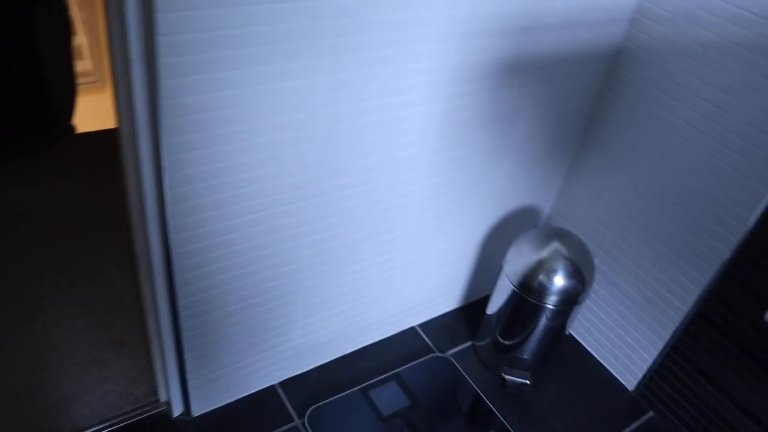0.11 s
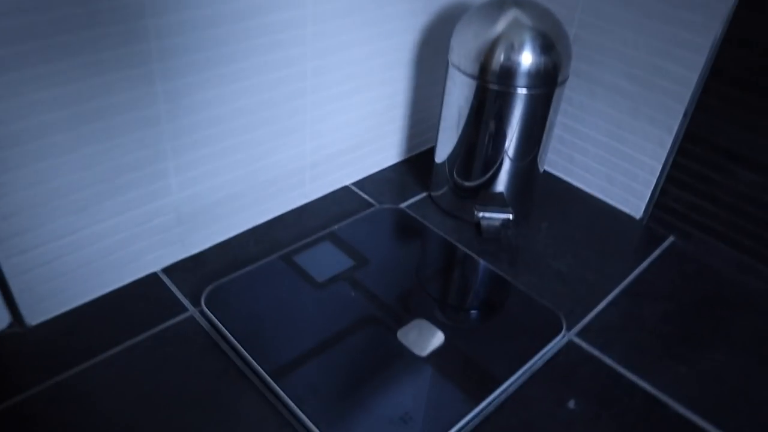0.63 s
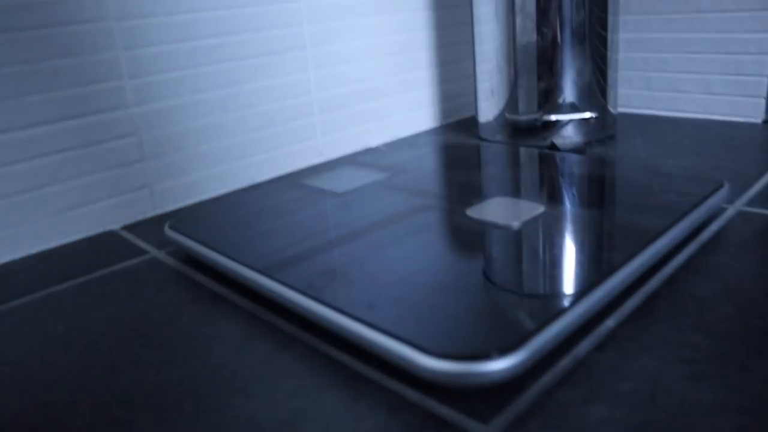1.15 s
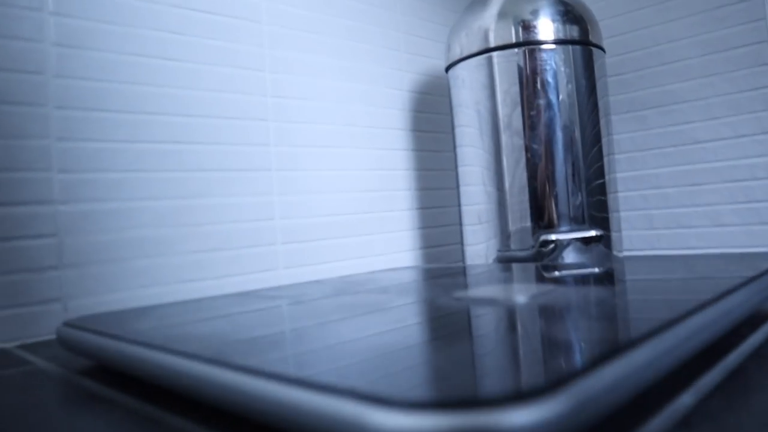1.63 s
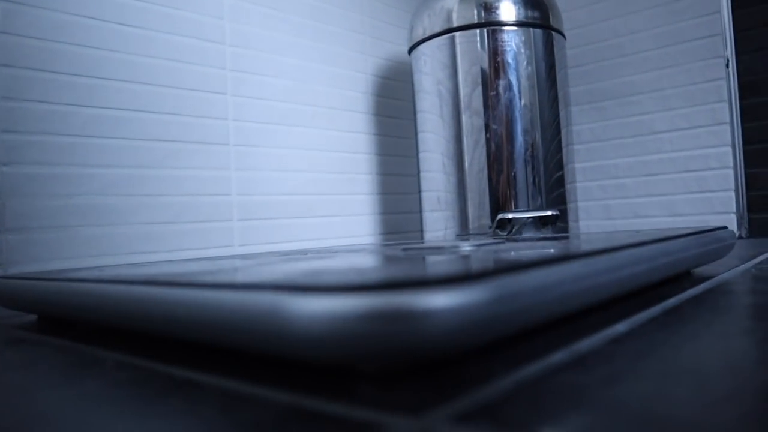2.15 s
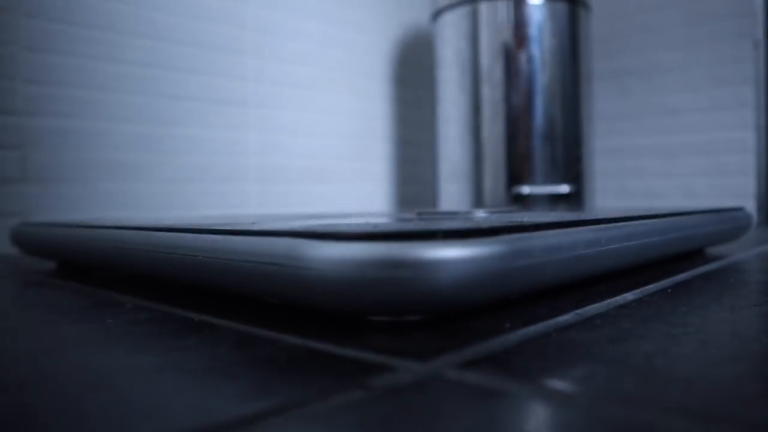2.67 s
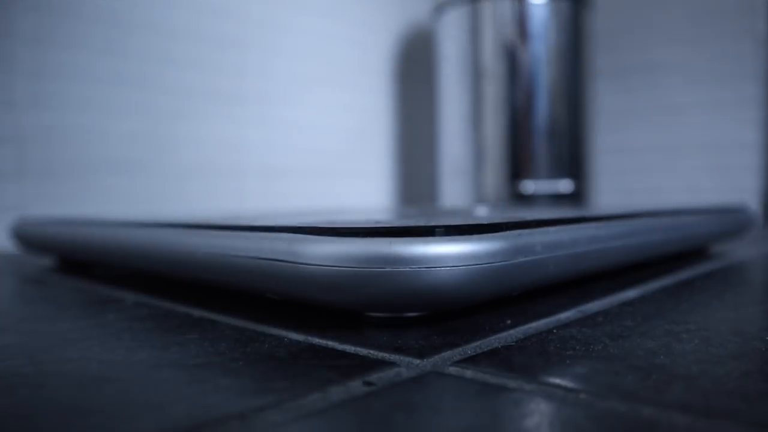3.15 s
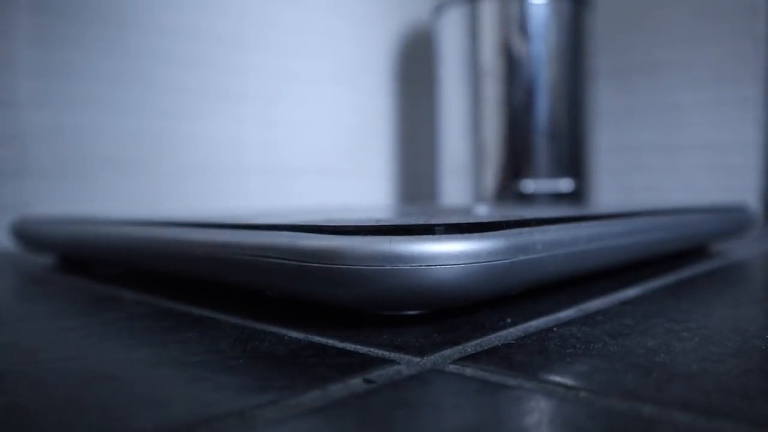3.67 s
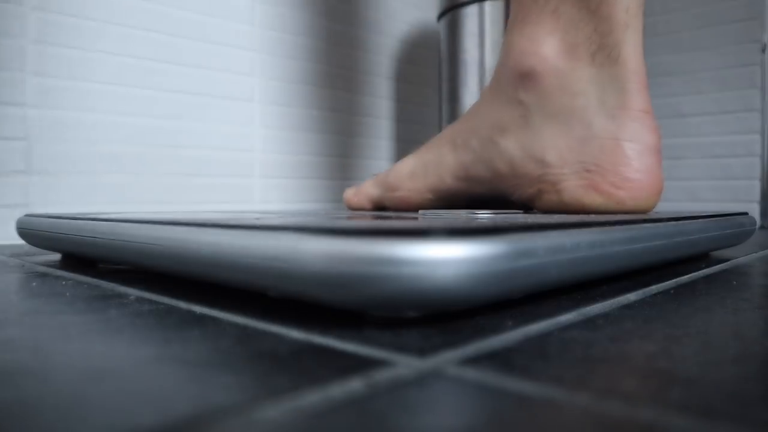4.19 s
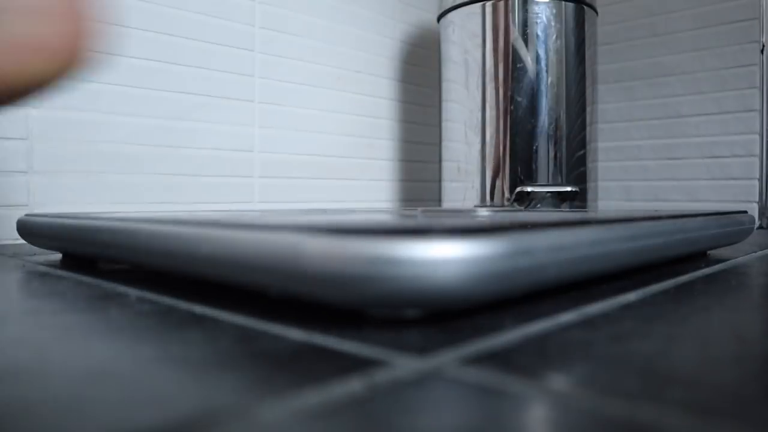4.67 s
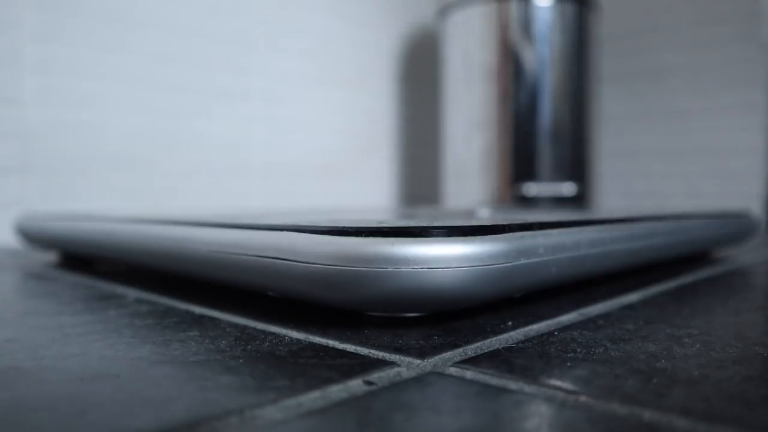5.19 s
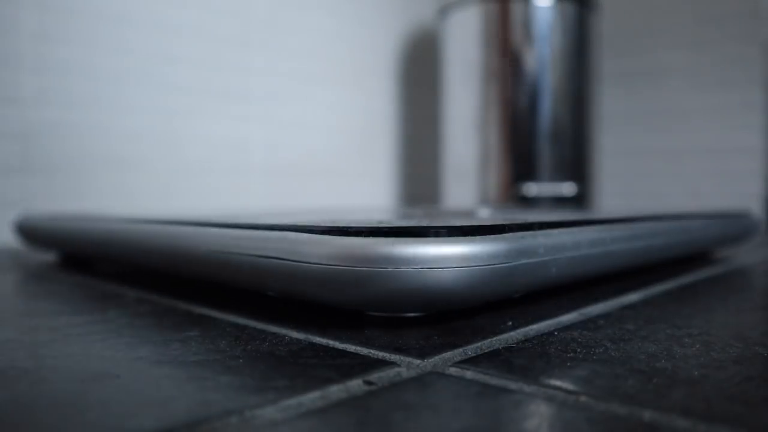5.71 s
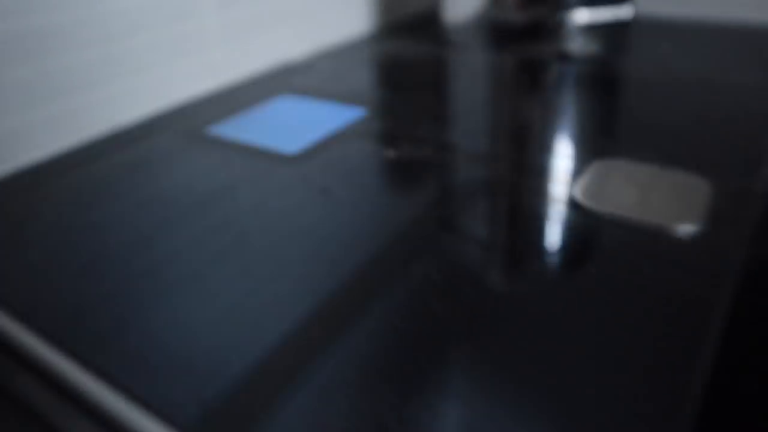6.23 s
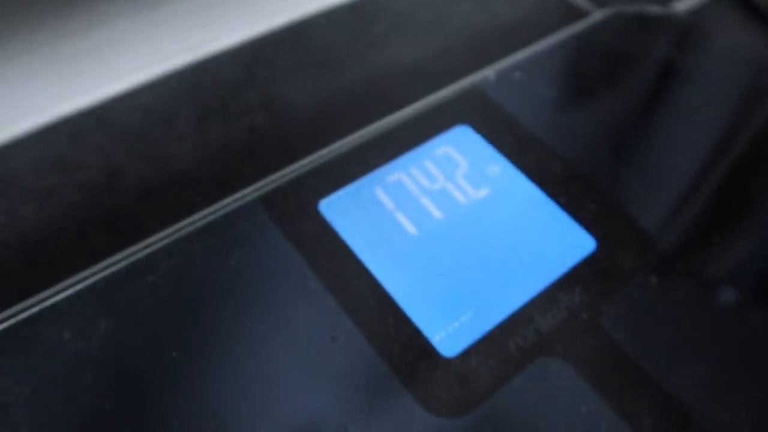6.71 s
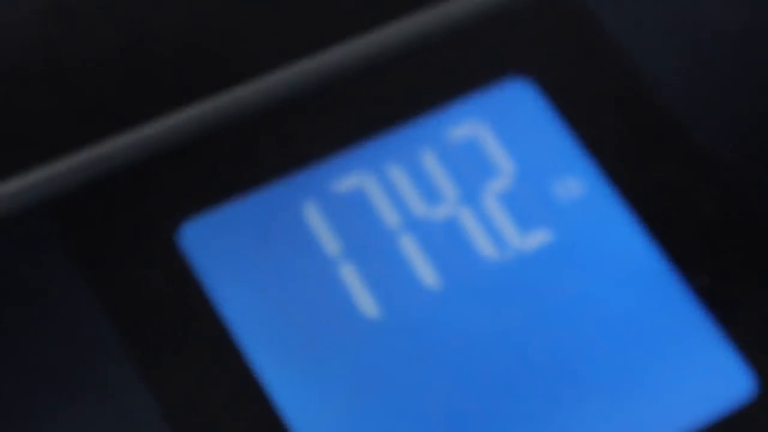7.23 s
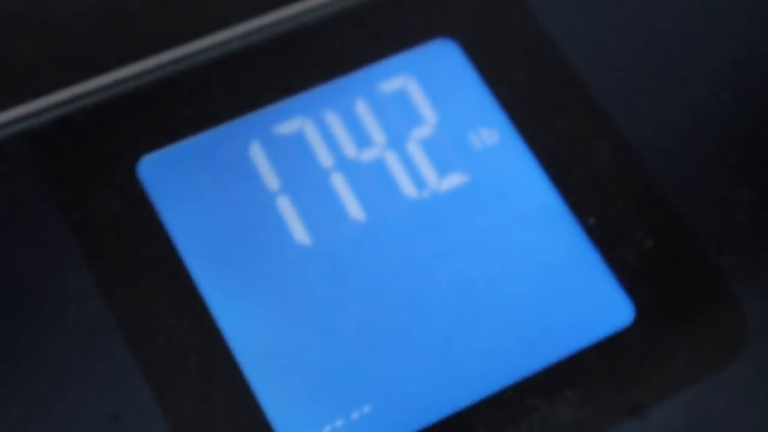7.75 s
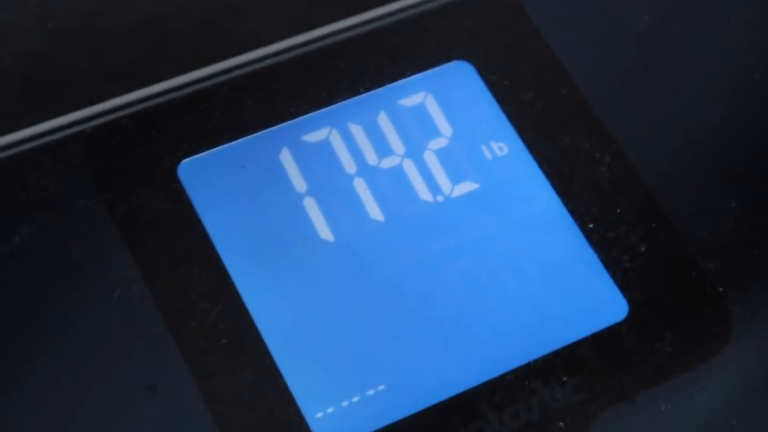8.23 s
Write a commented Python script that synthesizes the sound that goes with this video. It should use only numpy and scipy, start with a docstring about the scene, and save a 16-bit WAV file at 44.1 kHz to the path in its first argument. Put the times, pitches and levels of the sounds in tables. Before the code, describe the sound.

Close handling noise from a camera microphone: light bumps, a bright clack ringing off tiled walls, then a hard dull knock. A low floor boom and light clicks mark bare soles on a glass scale. Faint skin rustle and low room noise fill the pause. Heavy double clunks and rubbing follow as the camera is lifted, fading to small rattling ticks.

```python
"""Camera set down in a tiled bathroom

A hand-held camera is lowered to the tiles of a small hard bathroom, set down, left while bare feet step on and
off a glass scale, then picked up again. Knocks are short noisy contacts that ring the camera shell, steps are
choked low resonances of the floor, and skin and cloth rub as stick-slip noise. Decaying noise and paired
standing waves form the room; the camera widens its stereo picture in the treble and clips the highest peaks."""
import sys
import numpy as np
from scipy import signal
from scipy.fft import rfft, irfft, next_fast_len
from scipy.io import wavfile
from scipy.ndimage import uniform_filter1d, map_coordinates

SR = 44100
rng = np.random.default_rng(int(sys.argv[2]) if len(sys.argv) > 2 else 0)


def master(y):
    """Save y as 16-bit WAV."""
    cut = np.clip(np.atleast_2d(y).T, -1, 1)
    pcm = np.round(cut * 32767)  # scale
    wavfile.write(sys.argv[1], SR, pcm.astype(np.int16))


def invert_db(level):
    """Linear amplitude ratio for a level in decibels (20 dB per decade), elementwise."""
    return 10 ** (np.asarray(level, dtype=float) / 20)


N = 369116

# Relative spectrum of the fine fizz of rubbing. Each row: frequency in hertz, level in dB.
FIZZ_TONE = [(2940, -5.5), (5000, -6), (8090, -8), (9080, -6), (9950, -3), (11500, -1), (15800, -21.5)]


def shape(x, points):
    """Linear filtering: weights the spectrum of x by (Hz, dB) points joined on a logarithmic frequency axis."""
    hz, db = np.transpose(points)
    size = next_fast_len(x.shape[-1])
    f = np.maximum(np.arange(size // 2 + 1) * SR / size, 1)
    gain = invert_db(np.interp(np.log(f), np.log(hz), db))
    return irfft(rfft(x, size) * gain, size)[..., :x.shape[-1]]


def band(x, lo_hz, hi_hz):
    """Causal band-pass: a resonant filter responds only after its excitation."""
    sos = signal.butter(2, [lo_hz, min(hi_hz, SR / 2.2)], "band", fs=SR, output="sos")
    return signal.sosfilt(sos, x)


def unit(x):
    """Normalisation by mean power: scales x to rms 1."""
    return x / np.sqrt(np.mean(x ** 2))


def grainy(size, flicker_db, ms):
    """Stick-slip friction: mid and side noise whose level jumps together as the contact sticks and slips."""
    k = max(int(ms * SR / 1000), 1)
    jumps = np.repeat(rng.standard_normal(size // k + 1), k)[:size]
    jumps = uniform_filter1d(jumps, k)
    return rng.standard_normal((2, size)) * invert_db(flicker_db * jumps)


def add(out, x, s):
    """Superposition: mixes x into out from s seconds on."""
    i = int(s * SR)
    out[..., i:i + x.shape[-1]] += x[..., :N - i]


def ring(modes, t):
    """Modal superposition: a sum of exponentially decaying sines given as (Hz, dB, t60 in s)."""
    return sum(invert_db(db) * np.sin(2 * np.pi * hz * t) * 1000. ** (-t / t60) for hz, db, t60 in modes)


def curve(rows):
    """Amplitude envelopes: gains of the dB columns over time, silent outside the rows."""
    s, *columns = np.transpose(rows)
    t = np.arange(N) / SR
    return invert_db([np.interp(t, s, c, -120, -120) for c in columns])


def shell_ring():
    """Impulse response of the camera shell: a tick excites a few damped modes, broader ones dying sooner."""
    # Each row: frequency in hertz, bandwidth in hertz that sets t60 = 1.13 / bandwidth, level in dB.
    shell = [(880, 45, 17), (1550, 450, 21), (2310, 470, 26), (2980, 840, 11.5)]
    modes = [(hz, db, 1.13 / width) for hz, width, db in shell]
    return ring(modes, np.arange(1024) / SR)[None]


def knocks():
    """Impact excitation: a tick and rattle ring shell and struck spot; returns near sound, dull part, wall feed."""
    # Knocks and ticks on shell, tiles and scale. Each row: start in seconds, peak of the mids in dB,
    # pitch in hertz, treble in dB against the mids, wall feed in dB against the mids.
    hard_blows = [(0.655, -20.5, 1000, -53, -7.5), (0.842, -31, 980, -40, -6.5),
                  (0.8512, -22.5, 4670, -9, -8.5), (0.857, -33.5, 704, -40, 0.5),
                  (0.960, -24.5, 890, -35, -3.5), (1.133, -16, 1636, -10, -10), (1.403, -7, 2400, 1, 6.5),
                  (2.274, -20.5, 2050, -54, -10.5), (2.422, -33, 507, -28, 2),
                  (2.518, -3, 1500, -24, -21.5), (2.5392, -7.5, 1480, -34, -28),
                  (2.640, -19, 1630, -11, -18.5), (2.94, -39.5, 736, -6, 13), (3.179, -29, 1200, -4.5, 9.5),
                  (3.687, -27, 626, -8.5, 1), (3.807, -18.5, 880, 3.5, -3), (3.932, -23, 930, -42, -5.5),
                  (4.342, -26.5, 645, -7, 4.5), (4.434, -31.5, 1500, -10, -20),
                  (4.448, -15, 2120, -1.5, -4.5), (4.502, -21, 880, -29, -30.5),
                  (4.568, -27.5, 790, -3, -6), (5.13, -28, 720, -12, 10.5), (5.645, -33.5, 1550, -7, 0),
                  (5.919, -15, 1120, -1, -28.5), (5.985, -14.5, 2110, -25, -14),
                  (6.044, -8.5, 1930, -3, -17), (6.065, -16, 910, -4, -21), (6.287, -40.5, 860, 2, 19),
                  (6.3584, -9, 1390, -10, -15), (6.501, -41, 880, -2, 21), (6.78, -26.5, 650, -34, -44),
                  (6.835, -31, 507, -6, -13), (7.515, -34.5, 810, -1.5, -9), (7.716, -32, 870, -15, 1),
                  (7.749, -29, 880, -13, 1), (7.765, -21.5, 1870, -13, -9), (8.016, -33.5, 1680, -10, -5)]
    # Blows heard mostly through the walls, dull and wet. Each row: start in seconds, peak of the mids in dB,
    # pitch in hertz, rattle decay in milliseconds, treble in dB against the mids.
    hollow_blows = [(1.411, -26.5, 224, 51, -29), (1.543, -10.5, 1510, 64, -32), (1.547, -29, 298, 34, -36),
                    (1.778, -26, 915, 94, -27), (1.793, -23, 3500, 80, -23), (2.519, -13.5, 246, 3.9, -45),
                    (3.512, -36, 238, 6.3, -45), (4.351, -29.5, 304, 3.8, -35), (5.13, -29, 366, 5.1, -35),
                    (5.92, -18.5, 460, 24, -40), (2.526, -20.5, 304, 40, -38)]
    hard_rattle_ms, hollow_room_db = 4.87, 5.5
    tick, chatter_gain, chatter_ms = 6.25, 1.29, 1.9  # first tick and chatter against the rattle
    spot_cycles = 18.7  # cycles of the struck spot's own note within its t60

    near, dull, far = np.zeros((2, N)), np.zeros(N), np.zeros(N)
    t = np.arange(4096) / SR
    click = 1. * (t == 0)
    hard = [(*row, hard_rattle_ms) for row in hard_blows]
    hollow = [(s, db, hz, treble_db, hollow_room_db, ms) for s, db, hz, ms, treble_db in hollow_blows]
    for s, db, hz, treble_db, room_db, rattle_ms in hard + hollow:
        # the first touch chatters for a moment, then the rattle dies away
        chatter = 1 + chatter_gain * np.exp(-t * 1000 / chatter_ms)
        rattle = chatter * rng.standard_normal((2, len(t)))
        contact = (rattle + tick * click) * np.exp(-t * 1000 / rattle_ms)

        spot_ring = ring([(hz, 0, spot_cycles / hz)], t)[None]
        note = signal.fftconvolve(contact, spot_ring)[:, :len(t)]
        rung = signal.fftconvolve(contact, shell_ring())[:, :len(t)]
        spot = band(band(contact, hz / 1.97, hz * 2.44), 20, hz * 2.1)
        # dull blows barely wake the shell
        shell_gain = 0.62 * min(hz / 800, 1) ** 2
        mids = shell_gain * rung / np.abs(rung).max()
        mids = mids + spot / np.abs(spot).max() + 0.41 * note / np.abs(note).max()

        body = band(contact, 125, 397)
        treble = band(contact * np.exp(-t / 0.015), 5200, 12700)
        body_db = -11 - 7 * np.log2(hz / 1000)  # lower spots move more of the body
        parts, gains = (mids, body, treble), (0, body_db, treble_db)
        mids, body, treble = (invert_db(db + g) * x / np.abs(x[0]).max() for x, g in zip(parts, gains))
        add(near, mids + body + treble, s)
        add(dull, body[0], s)

        # the walls hear the blow from all sides, so the shell's own colour evens out
        wall_mids = band(band(click, hz / 5, hz * 2.58), hz / 5, hz * 2.58)
        wall_treble = invert_db(treble_db - 5.5) * band(click, 5650, 13200)
        add(far, invert_db(db + room_db) * (wall_mids + wall_treble), s)
    return near, dull, far


def thuds():
    """Damped resonance: a soft push swells into a ring until settling weight chokes it; near sound, wall feed."""
    # Dull blows through floor or shell. Each row: start in seconds, level of the free ring in dB,
    # pitch in hertz, rise in milliseconds, time until damped in milliseconds.
    blows = [(0.301, -21.5, 120, 2.7, 5.6), (0.621, -31, 68.5, 2.9, 35), (0.685, -24, 83.3, 1.8, 11),
             (1.411, -29, 60, 22, 240), (1.408, -30, 294, 3.1, 120), (1.546, -33, 325, 3.8, 54),
             (1.503, -22, 60, 5.1, 105), (1.789, -37.5, 64, 15, 150), (2.419, -29, 191, 3.4, 16),
             (2.488, -27.5, 195, 3.8, 18), (2.5174, -7.5, 185, 1.8, 6.5), (2.545, -22.5, 217.7, 9.1, 53),
             (2.64, -24.5, 229, 7.8, 59), (2.549, -33, 146, 7.3, 165), (2.962, -31.5, 65.6, 45, 110),
             (3.065, -22.5, 65.4, 22, 37), (3.2345, -4, 63, 17, 54.5), (3.235, -31.5, 232, 12, 32),
             (3.51, -33.5, 234, 4.2, 35), (3.297, -27, 63.6, 2.1, 110), (3.506, -27, 70, 4.6, 22),
             (3.686, -24, 94, 3.6, 14.5), (3.81, -32.5, 102, 2.1, 17), (4.35, -18.5, 64.9, 2.4, 97),
             (4.502, -22.5, 212, 4.6, 19.5), (4.499, -32, 374, 4, 39), (4.57, -45.5, 362, 6.8, 47),
             (5.203, -21, 60, 8.7, 63), (5.629, -36, 58, 7.3, 40), (5.917, -8, 94, 5.3, 18),
             (5.985, -3.5, 145, 0.93, 8.2), (6.286, -25, 380, 3.5, 13), (6.323, -5, 104, 2.7, 8.3),
             (6.339, -6.5, 89, 1.1, 7.7), (6.391, -27, 150, 3, 8), (6.498, -23, 170, 2.7, 5.3),
             (6.557, -22, 72.3, 4.6, 14), (6.606, -25.5, 151.6, 2.2, 5.7), (7.137, -16, 165, 3.5, 11)]
    floor_ms = 29  # thuds damped sooner than this feed the room less, in proportion
    ring_per_damp = 6.66  # free t60 as a multiple of the time until damped

    out, ms = np.zeros((2, N)), np.arange(SR // 2) * 1000 / SR
    for s, db, hz, rise_ms, damped_ms in blows:
        t60 = ring_per_damp * damped_ms / 1000
        settling = np.tanh((ms - damped_ms) / (1.0 + 0.073 * damped_ms))
        choke = 0.28 + 1.12 * (1 - settling) / 2
        # neighbouring modes drift out of step and beat against the higher rings
        drift = unit(uniform_filter1d(rng.standard_normal(len(ms)), size=700))
        beating = invert_db(min(hz / 50, 6.0) * np.minimum(ms / floor_ms, 1) * drift)
        swell = 1 - np.exp(-(ms / rise_ms) ** 2)
        thud = swell * choke * beating * ring([(hz, db, t60)], ms / 1000)
        wall_share = min(damped_ms / floor_ms, 1)
        add(out, thud * np.array([[1], [wall_share]]), s)
    return out


def scrapes():
    """Stick-slip friction: quick scrapes are coarse, long ones smoother; quiet long ones swell and fade softly."""
    # Broad rubs of fingers, strap and soles. Each row: start in seconds, length in seconds,
    # rms level before fizz and fades in dB, centre in hertz, fizz in dB against the rub.
    broad_rubs = [(0.151, 0.15, -53, 2700, 2), (0.279, 0.19, -48.5, 3400, 2.5),
                  (0.819, 0.063, -45, 1710, -28), (2.96, 0.18, -45, 1100, -6),
                  (3.156, 0.069, -44, 1470, -7.5), (3.682, 0.04, -47, 1570, -6.5),
                  (3.799, 0.15, -54.5, 2370, 2), (4.446, 0.13, -55.5, 1700, 10.5),
                  (4.905, 0.06, -57, 5370, 11), (5.026, 0.12, -48, 4370, -7), (5.13, 0.11, -51, 487, 4.5),
                  (5.122, 0.3, -58, 3700, 16), (5.466, 0.19, -50.5, 3580, 3), (5.92, 0.052, -24, 980, -8.5),
                  (5.974, 0.015, -30, 1910, -2.5), (6.046, 0.026, -27, 1580, -35),
                  (6.067, 0.061, -45.5, 1410, -2), (6.28, 0.038, -36, 880, -10.5),
                  (6.361, 0.04, -37.5, 2080, -10), (6.399, 0.16, -44, 1550, -13.5),
                  (6.542, 0.15, -39, 1820, -10.5), (6.86, 0.21, -32.5, 1510, -9.5),
                  (7.001, 0.25, -35.5, 1310, -6)]
    # Narrow scuffs and faint hums that hold one resonance. Each row: start in seconds, length in seconds,
    # rms level before fizz and fades in dB, centre in hertz, width in octaves, glide in octaves.
    narrow_scuffs = [(0.817, 0.059, -45, 880, 1.34, -0.022), (1.157, 0.1, -41.5, 2150, 0.92, 0.23),
                     (3.149, 0.83, -55.5, 592, 0.13, -.15), (4.76, 0.31, -51.5, 515, 0.46, -0.35),
                     (5.129, 0.087, -40, 325, 1.6, 0.002), (6.29, 0.069, -34.5, 933, 0.36, 0.0085),
                     (6.32, 0.03, -24, 3030, 1.33, -0.13), (6.464, 0.19, -45, 730, 0.71, 0.308),
                     (6.539, 0.11, -40, 1650, 0.62, 0.08), (6.661, 0.059, -40.5, 430, 2.84, -0.081),
                     (6.692, 0.08, -50, 1630, 0.78, 0.116), (6.882, 0.14, -38, 240, 1.9, 0.14),
                     (7.015, 0.21, -32.5, 330, 1.08, 0.02), (7.479, 0.062, -50, 2980, 1.43, 0.026),
                     (6.619, .1, -48, 815, 0.71, -.3)]
    broad_octaves, scuff_fizz_db = 3.35, -11.5
    wander_share = .05  # rms pitch wander as a share of a rub's width

    out = np.zeros((2, N))
    broad = [(*row, broad_octaves, 0) for row in broad_rubs]
    narrow = [(*row, scuff_fizz_db, octaves, glide) for *row, octaves, glide in narrow_scuffs]
    for s, length, db, hz, fizz_db, octaves, glide in broad + narrow:
        size = int(length * SR)
        edges = hz / 2 ** (octaves / 2), hz * 2 ** (octaves / 2)
        coarse_db = 2.15 + 3.15 * np.exp(-length / 0.06)
        rub = band(band(grainy(3 * size, coarse_db, 3.3), *edges), *edges)

        # the resonance slides and wanders as the contact moves: read the noise at a varying speed
        wander = unit(uniform_filter1d(rng.standard_normal(size), size=900))
        bend = glide * np.linspace(-.5, .5, size) + wander_share * octaves * wander
        place = np.cumsum(2 ** np.clip(bend, -1, 1))
        rub = unit(np.array([map_coordinates(channel, [place]) for channel in rub]))

        # the shell under the skin sings along
        singing = unit(signal.fftconvolve(rub, shell_ring())[:, :size])
        rub = unit(rub + 0.26 * singing)
        rub = rub + invert_db(fizz_db) * unit(shape(grainy(size, coarse_db, 0.5), FIZZ_TONE))
        fade_share = np.clip(-.25 * length * (db + 27.0), .2, 1)
        add(out, invert_db(db) * rub * signal.windows.tukey(size, fade_share), s)
    return out


def pings():
    """Modal excitation: each tick strikes a small loose part's modes with its own balance and slight detuning."""
    # Each row: start in seconds, base level in dB.
    ticks = [(7.298, -46), (7.432, -53), (7.719, -44), (7.744, -40), (7.767, -32), (7.787, -54),
             (7.975, -44.5)]
    # The part's modes. Each row: nominal frequency in hertz, nominal level in dB, t60 in seconds.
    part_modes = [(1010, -1, 0.033), (1650, 3, 0.045), (2370, -1, 0.036), (2830, -4.5, 0.073)]

    out, t = np.zeros((2, N)), np.arange(SR // 8) / SR
    variations = rng.standard_normal((len(ticks), len(part_modes), 2))
    for (s, db), variation in zip(ticks, variations):
        modes = [(hz * (1 + 0.034 * detune), db + mode_db + 2.2 * balance, t60)
                 for (hz, mode_db, t60), (balance, detune) in zip(part_modes, variation)]
        add(out, ring(modes, t) * np.array([[1], [.4]]), s)
    return out


def rubbing():
    """Friction of skin and cloth: a broad rasp, a fine fizz and the shell's hollow drone under them."""
    # Background rustle, with a clatter's fading tail near 1.6 s and a loud drag near 7.05 s.
    # Each row: time in seconds, rasp level in dB, fizz level in dB.
    rustle = [(0.0, -53, -68), (0.202, -54.5, -48.5), (1.37, -58, -96), (1.4, -56, -85), (1.61, -52, -81),
              (2.08, -55, -76), (2.54, -56, -70), (5.42, -51.5, -56), (5.69, -56, -62), (6.8, -53.5, -69),
              (7.05, -35.5, -29), (7.24, -56.5, -73), (8.37, -57, -76)]
    # Relative spectrum of the rasp. Each row: frequency in hertz, level in dB.
    rasp_tone = [(350, -5), (600, 0), (858, -2.5), (1380, -4.5), (2330, -7.5), (2510, -7.5), (8000, -23.5),
                 (10400, -40), (17600, -120)]
    drone_db = 1.5  # against the rasp

    rasp = unit(shape(grainy(N, 0.76, 2.9), rasp_tone))
    fizz = unit(shape(grainy(N, 1.3, 1.5), FIZZ_TONE))
    drone = unit(band(grainy(N, 3.2, 9.0), 123, 572))
    level, treble = curve(rustle)
    return level * (rasp + invert_db(drone_db) * drone) + treble * fizz


def rumble():
    """Forced vibration: uneven pushes excite the springy floor."""
    # Low sway of hand and floor. Each row: time in seconds, level in dB.
    sway = [(0.0, -54), (0.86, -45.5), (1.4, -86), (1.54, -54.5), (2.91, -45), (3.35, -33.5), (3.94, -54),
            (6.25, -52), (6.57, -59.5), (8.37, -58)]
    return curve(sway) * unit(band(grainy(N, 2.2, 25.0), 41.0, 110.0))


def room():
    """Room impulse response: dense echoes start dull and fade at much the same pace in every band; modes apart."""
    # Standing waves. Each row: nominal frequency in hertz, relative level in dB, t60 in seconds.
    wave_modes = [(60, -9.5, 1), (146, 2.5, 0.36), (225.6, 1, 1), (255, 4, 0.49), (325, -9, 0.8),
                  (369, 2, 0.82), (438.6, 3, 0.92), (467, 6, 0.43), (514, 8, 1), (608, -13, 0.69)]
    # Decay of the echoes. Each row: frequency in hertz, t60 in seconds.
    echo_t60 = [(300, 0.55), (1000, 0.65), (3000, 0.63), (6000, 0.69), (12000, 0.68)]
    # Relative colour of the echoes. Each row: frequency in hertz, gain in dB.
    echo_tone = [(100, 9), (250, 6.5), (500, 1), (1000, -3.5), (3000, -3), (6000, -9), (11500, -15),
                 (13200, -36)]
    pair_spacing = 0.0359  # sets how far apart the two beating twins of a standing wave lie

    t = np.arange(int(1.3 * SR)) / SR
    hz, t60 = np.transpose(echo_t60)
    echoes = np.zeros((2, len(t)))
    for lo in 75 * 2. ** np.arange(8):  # octave bands
        decay = 1000. ** (-t / np.interp(lo * 2 ** .5, hz, t60))
        echoes += band(rng.standard_normal((2, len(t))), lo, 2 * lo) * decay
    echoes = shape(echoes, echo_tone) * np.minimum(t / 0.00069, 1)

    spread = rng.uniform(0.41, 1, len(wave_modes))
    lower = [(hz * (1 - pair_spacing / 4), db, t60) for hz, db, t60 in wave_modes]
    upper = [(hz * (1 + pair_spacing * e), db, t60) for (hz, db, t60), e in zip(wave_modes, spread)]
    modes = lower + upper
    # alternate modes have opposite sign in the side signal
    standing = np.array([ring(modes, t), ring(modes[1::2], t) - ring(modes[::2], t)])
    return invert_db(-33.0) * echoes, invert_db(-54.5) * standing


def steady_noise():
    """Stationary random noise: a constant background, strongest in the bass, independent in mid and side."""
    # Relative spectrum. Each row: frequency in hertz, level in dB.
    noise_tone = [(18, -49), (30, 10.5), (66, 14.5), (220, -3), (353, -25), (628, -44), (795, -20),
                  (3030, -12.5), (11500, -28), (15800, -68)]
    return invert_db(-57) * unit(shape(rng.standard_normal((2, N)), noise_tone))


def grip_leak(mid, low):
    """Asymmetric coupling: a grip off centre leaks mid into side."""
    # Lean of the grip. Each row: time in seconds, lean in dB before soft limiting (positive to the left).
    lean = [(5.8, 2), (5.95, -6), (6.03, -2), (6.8, 9.5), (7.2, -1.5)]
    lean_db = np.interp(np.arange(N) / SR, *np.transpose(lean))
    return np.tanh(lean_db / 9) * (mid + 5.5 * low)


def scene():
    """Superposition of direct and reverberant sound: all sources as mid and side, then left and right."""
    near, dull, far = knocks()
    low, floor = thuds()
    rubs = scrapes()
    echoes, standing = room()
    wall_feed = invert_db(26.0) * far[None] + invert_db(-5.5) * dull + invert_db(-7.5) * floor + invert_db(-14) * rubs[0]
    wet = signal.fftconvolve(wall_feed, echoes)[:, :N]
    boom = signal.fftconvolve(invert_db(-8.5) * dull + invert_db(-15.0) * floor[None], standing)[:, :N]

    mid, side = near + rubs + pings()
    side = side + grip_leak(mid, low)
    mid, side = (np.array([mid, side]) + wet + rubbing() + rumble() + steady_noise() + boom
                 + low * np.array([[1], [0]]))
    return np.array([mid + side, mid - side])


def band_limit(x):
    """A steep low-pass at the top of the band."""
    return signal.sosfilt(signal.butter(12, 15940, fs=SR, output="sos"), x)


def record(dry):
    """Differential pickup: the camera lifts the difference of its two close ports in the treble, then clips."""
    # Gain of the side signal. Each row: frequency in hertz, gain in dB.
    side_gain = [(30, -19), (60, -46), (110, -14.5), (200, -11.5), (380, -5.5), (700, -0.5), (1290, 3),
                 (2380, 4.5), (4400, 6.5), (8120, 7.5), (15000, 4)]
    mid = (dry[0] + dry[1]) / 2
    side = shape((dry[0] - dry[1]) / 2, side_gain)
    mix = np.clip([mid + side, mid - side], -1, 1)
    return band_limit(mix)


dry = scene()
out = record(dry)
master(out)
```